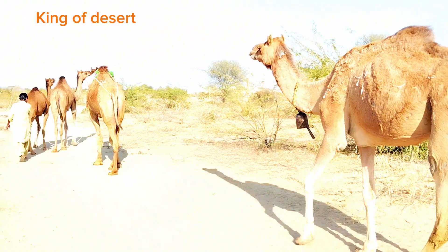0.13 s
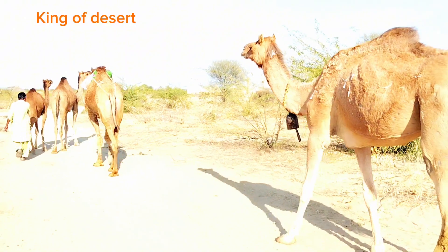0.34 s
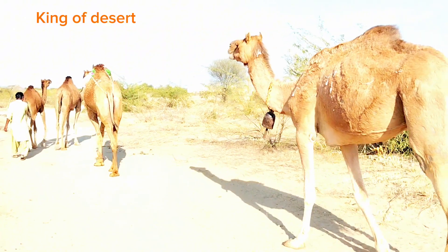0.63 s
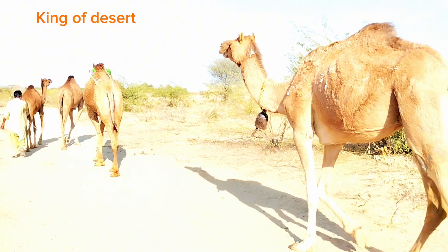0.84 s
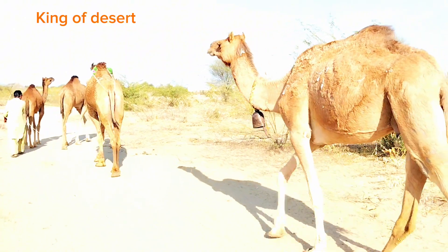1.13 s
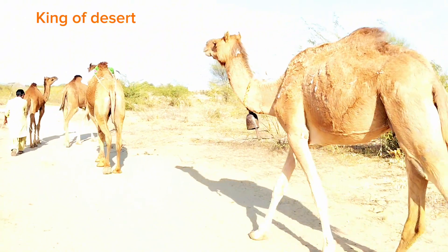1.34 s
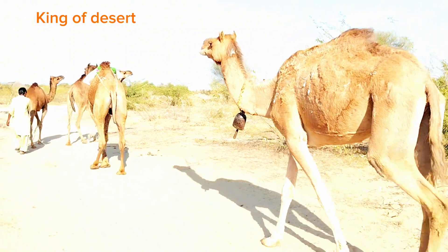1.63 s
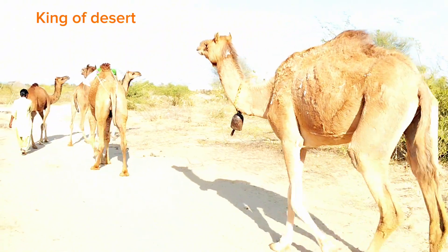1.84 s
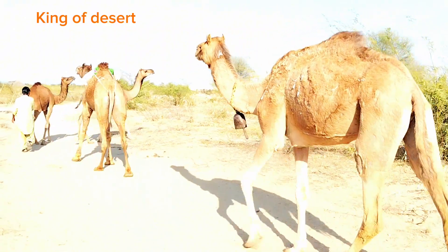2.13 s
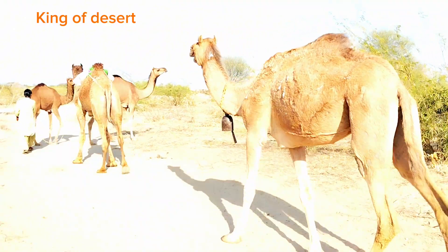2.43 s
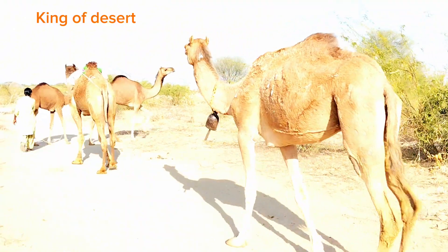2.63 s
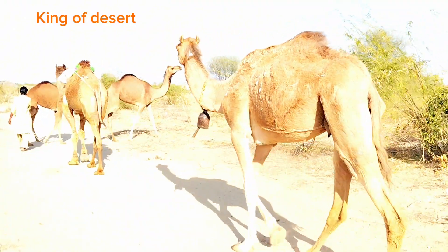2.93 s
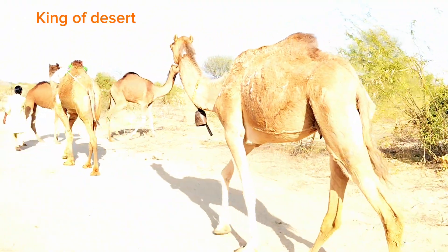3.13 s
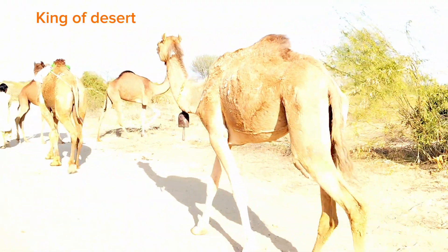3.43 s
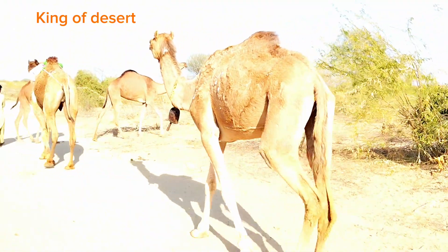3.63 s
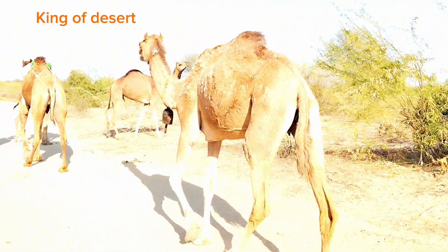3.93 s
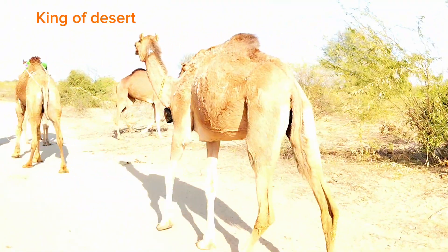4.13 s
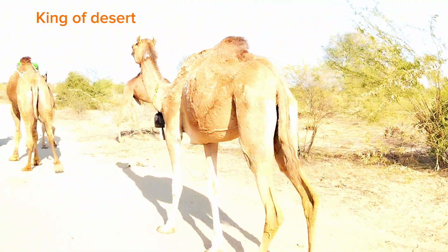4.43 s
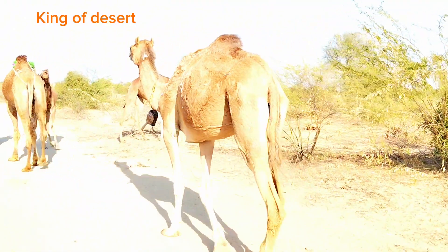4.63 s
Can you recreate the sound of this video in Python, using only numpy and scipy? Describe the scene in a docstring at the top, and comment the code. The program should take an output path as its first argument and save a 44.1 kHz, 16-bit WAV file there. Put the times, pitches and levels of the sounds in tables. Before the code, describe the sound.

A sheet-metal bell on a walking camel's neck clanks in loose clusters with each stride, its low hollow note humming on over soft wind.

```python
"""On a sandy track in open desert a camel walks with a sheet-metal bell on its neck, nearly all on the right.
At each stride the clapper strikes, bounces and scrapes; the bell's low pair beats and hums on, under dying wall
modes and bursts of clang. Feet scuff the sand in short resonant noise, with dry ticks and random crackle. A farther
bell is heard twice, first as a tail; shaped noise and pressure pulses make the light wind on the microphone."""
import sys
import numpy as np
from scipy import signal
from scipy.fft import rfft, irfft
from scipy.io import wavfile
from scipy.ndimage import uniform_filter1d

SR = 44100
rng = np.random.default_rng(int(sys.argv[2]) if len(sys.argv) > 2 else 0)


def int16_out(signal):
    """Quantize to a 16-bit WAV file."""
    q = np.round(np.clip(np.atleast_2d(signal).T, -1, 1) * 32767)
    wavfile.write(sys.argv[1], SR, q.astype(np.int16))


N = 211044
TIME = np.arange(N) / SR

# clapper blows, each stride's strike and its rebounds; levels are relative within each layer:
# [t/s, hum level/dB, twin level/dB, wall ring level/dB, treble level/dB, rim spot 0-2]
BLOWS = [(0.1654, -31, -22.5, -10.5, -11.5, 0.052), (0.2376, -46.5, -42.5, -51.5, -24.5, 0),
         (0.2523, -68, -26, -33.5, -20, 0), (1.1793, -17, -31.5, -1.5, -1, 0),
         (1.2145, -18.5, -73, -27, -10, 0), (1.291, -24.5, -51, -35, -17.5, 0),
         (1.3266, -32, -59, -10, -16, 1.53), (1.421, -66, -48, -39, -22.5, 2), (2.1204, -19, -28, -6, 4, 1),
         (2.1557, -23.5, -29, -1.5, -23, 1), (2.2298, -46.5, -50, -13, -12.5, 1.5),
         (2.2425, -30.5, -20.5, -17.5, -38.5, 2), (2.356, -31, -72.5, -45, -17, 2),
         (2.7996, -28.5, -36, -22.5, -23.5, 2), (2.8669, -31.5, -84, -54, -25, 2),
         (3.1903, -19.5, -24.5, -2.5, 2.5, 2), (3.2354, -34, -32, -13, -5, 0),
         (3.287, -59, -31.5, -39.5, -10.5, 2), (3.3631, -57.5, -34, -8, -21.5, 0.24),
         (3.3978, -35, -70, -22, -24.5, 2), (3.4423, -41.5, -70.5, -14.5, -23.5, 1.3),
         (3.8511, -25, -19.5, -15.5, -7.5, 1.42), (4.108, -27, -25, -6, -3.5, 1.57),
         (4.1434, -64, -54, -42, -19, 1), (4.1777, -42.5, -36.5, -7.5, -21, 1),
         (4.211, -28, -24.5, -11, -6, 0), (4.2875, -80, -35, -18.5, -24, 1.87),
         (4.7513, -41, -65.5, -22.5, -25, 2)]
# spectrum of the crowd of small, short wall modes, relative: [f/Hz, level/dB]
CLANG_SPECTRUM = [(700, -12), (1800, -7), (2700, -16.5), (3450, 12), (4200, -1.5), (5200, 1), (6800, 1.5),
                  (8200, -9), (9300, -13.5), (10500, -40), (15500, -27.5)]


def amp(db):
    """Decibels to gain."""
    return 10 ** (np.asarray(db) / 20)


def unit(x):
    """Scales to rms 1."""
    return x / np.sqrt(np.mean(x ** 2) + 1e-20)


def read(points, hz):
    """Reads a spectrum in dB on a log-frequency axis."""
    f, db = np.transpose(points)
    return np.interp(np.log(hz + 1), np.log(f + 1), db)


def add(mix, s, sound):
    """Mixes a sound in at time s."""
    part = mix[max(round(s * SR), 0):][:len(sound)]
    part += sound[:len(part)]


def coloured(points):
    """Noise of rms 1 with the given spectrum."""
    spectrum = rfft(rng.standard_normal(N))
    gain = amp(read(points, np.fft.rfftfreq(N, 1 / SR)))
    return unit(irfft(spectrum * gain, N))


def ring(t, hz, t60):
    """One dying mode, struck at t = 0; it falls 60 dB in t60 seconds."""
    t = np.maximum(t, 0)
    return np.sin(2 * np.pi * hz * t) * np.exp(-np.log(1000) * t / t60)


def resonate(x, hz, width_hz):
    """A resonance of gain 1."""
    r = np.exp(-np.pi * width_hz / SR)
    return 2 * signal.lfilter([1 - r], [1, -r * np.exp(2j * np.pi * hz / SR)], x).real


def hum(level_db=1.65, knock_db=-8.5, knock_hz=616.0, knock_width_hz=121.0):
    """The low pair beats; the air in the bell takes a few cycles to swell and radiate it."""
    # the bell's lowest note, a long hum and its short twin: [f/Hz, t60/s]
    hum_pair = [(470.15, 1.65), (478.3, .28)]
    # the bell leans on the neck and loses its hum: [from t/s, to t/s, loss/dB]
    leans = [(1.368, 1.502, 11.5), (2.903, 2.932, 19), (4.388, 4.448, 15.5)]
    cavity_hz, cavity_width_hz = 483.5, 31.5

    loss = amp(sum(db * np.clip((TIME - a) / (b - a), 0, 1) for a, b, db in leans))
    wall = np.zeros(N)
    for s, hum_db, twin_db, *_ in BLOWS:
        first = int(s * SR)
        span = slice(first, first + 3 * SR // 2)
        pair = sum(amp(db) * ring(TIME[span] - s, *mode) for db, mode in zip((hum_db, twin_db), hum_pair))
        wall[span] += pair * loss[first] / loss[span]  # only losses after the blow count
    knock = amp(knock_db) * resonate(wall, knock_hz, knock_width_hz)  # makes each onset hollow
    return amp(level_db) * (resonate(wall, cavity_hz, cavity_width_hz) - knock)


def wall_modes(sustain=1.605, touch_db=3.0, ring_touch_db=2.0, low_growth=1.03, tilt_db=-1.5):
    """Each blow rings the upper modes its rim spot favours; every later touch damps them, the treble most."""
    # upper wall modes, t60 before the sustain factor where f is 3 kHz or less:
    # [f/Hz, t60/s, level at rim spot 0/dB, level at spot 1/dB, level at spot 2/dB]
    modes = [(1180.5, 0.95, -50.0, -52.5, -38.0), (1327.5, 0.55, -51.0, -59.0, -55.0),
             (1818.0, 0.3, -59.0, -73.0, -56.0), (2025.0, 0.3, -67.0, -59.0, -66.0),
             (2334.0, 0.75, -63.0, -44.0, -45.0), (2392.0, 0.5, -42.0, -40.0, -54.0),
             (3477.0, 0.25, -62.0, -61.0, -48.0), (3590.0, 0.2, -50.0, -56.0, -60.0),
             (3673.0, 0.45, -50.0, -42.0, -44.0), (3918.0, 0.4, -55.0, -58.0, -60.0),
             (4017.0, 0.4, -62.0, -52.0, -41.0), (4139.0, 0.35, -63.0, -49.0, -61.0),
             (4267.0, 0.25, -67.0, -34.0, -58.0), (4580.0, 0.2, -58.0, -47.0, -44.0),
             (4619.0, 0.25, -59.0, -38.0, -52.0), (4778.0, 0.3, -75.0, -61.0, -43.0),
             (4968.0, 0.3, -67.0, -50.0, -53.0), (5128.0, 0.25, -71.0, -45.0, -62.0),
             (5540.0, 0.2, -59.0, -44.0, -62.0), (5711.0, 0.22, -73.0, -39.0, -59.0),
             (6110.0, 0.25, -57.0, -56.0, -53.0), (6643.0, 0.25, -49.0, -40.0, -59.0),
             (6805.0, 0.22, -57.0, -57.0, -54.0), (7125.0, 0.25, -58.0, -50.0, -53.0),
             (7465.0, 0.18, -70.0, -44.0, -63.0), (7995.0, 0.18, -74.0, -52.0, -64.0)]
    hz, t60, *spot_db = np.transpose(modes)
    low, treble = hz < 1500, hz > 3000
    life = t60 * np.where(treble, 1, sustain)
    shapes = ring(TIME[:SR], hz[:, None], life[:, None])
    sign = (-1) ** np.arange(len(hz))  # neighbouring modes start in opposite directions
    octaves = np.log2(hz / 6000)
    starts = np.transpose(BLOWS)[0]
    out = np.zeros(N)
    for s, _, _, ring_db, high_db, spot in BLOWS:
        nearness = np.maximum(1 - abs(np.arange(len(spot_db)) - np.clip(spot, 0, 2)), 0)
        ring_force_db = np.where(low, low_growth * ring_db, ring_db)  # the lowest grow slightly faster with force
        force_db = np.where(treble, high_db + tilt_db * octaves, ring_force_db)
        size = sign * amp(force_db) * (nearness @ amp(spot_db))
        touches = np.searchsorted(starts[starts > s], s + TIME[:SR])  # later blows so far
        for group, loss_db in ((~treble, ring_touch_db), (treble, touch_db)):
            add(out, s, amp(-abs(loss_db) * touches) * ((size * group) @ shapes))
    return out


def crowd(t60, count=90):
    """Many close, short wall modes of uneven strength, one row each."""
    hz = np.linspace(700, 9600, count) + rng.uniform(-45, 45, count)
    life = t60 * np.exp(0.21 * rng.standard_normal(count))
    uneven_db = 4.5 * rng.standard_normal(count)
    strength = amp(read(CLANG_SPECTRUM, hz) + uneven_db)
    return strength[:, None] * ring(TIME[:SR // 3], hz[:, None], life[:, None])


def clang(clang_db=-43.5, crack_db=-34.5, t60=0.11, chatter=0.36, count=3):
    """Each blow cracks and shakes the crowd of small modes; the clapper then chatters lightly on the wall."""
    modes, hiss, out = crowd(t60), coloured(CLANG_SPECTRUM), np.zeros(N)
    hardness_db = [-1., 4., 1.]  # by rim spot
    snap = np.exp(-TIME[:SR // 3] / .004)
    for s, *_, db, spot in BLOWS:
        force = amp(db + np.interp(spot, range(len(hardness_db)), hardness_db))
        delays = np.r_[0, np.cumsum(rng.uniform(.003, .02, count))]  # seconds after the blow
        shares = np.r_[1, chatter * rng.random(count)]
        for delay, share in zip(delays, shares):
            tail = rng.standard_normal(len(modes)) @ modes
            tail /= np.std(tail[:SR // 50])
            crack = np.roll(hiss, rng.integers(N))[:len(snap)] * snap
            add(out, s + delay, force * share * (amp(clang_db) * tail + amp(crack_db) * crack))
    return out


def clunk(level_db=-62.0, hz=910.0, width_hz=1800.0, fall_s=.012, growth=0.33):
    """The clapper itself gives a dull, rough knock at each blow: resonant noise that dies fast."""
    out, t = np.zeros(N), TIME[:SR // 8]
    for s, _, _, ring_db, *_ in BLOWS:
        noise = rng.standard_normal(len(t))
        body = unit(resonate(resonate(noise, hz, width_hz), hz, width_hz))
        add(out, s, amp(level_db + growth * ring_db) * body * np.exp(-t / fall_s))
    return out


def scrapes(level_db=-6.0, t60=0.061, slips_per_s=220):
    """The sliding clapper sticks and slips, each slip a tiny tap on the damped wall."""
    # slides along the rim, levels before level_db: [t/s, level/dB, length/s]
    slides = [(0.0, -62.5, 0.086), (1.41, -59, 0.091), (1.653, -61, 0.049), (1.931, -58, 0.049),
              (2.202, -38.5, 0.064), (2.307, -51.5, 0.025), (2.371, -51, 0.032), (2.778, -54, 0.059),
              (2.986, -62.5, .07), (3.349, -45.5, 0.082), (3.445, -59.5, 0.13), (3.713, -60.5, 0.021),
              (3.981, -57.5, 0.08), (4.196, -53, 0.18)]
    modes, out = crowd(t60), np.zeros(N)
    for s, db, length in slides:
        size = int(length * SR)
        taps = rng.standard_normal(N)[:size]
        slipping = rng.random(N)[:size] < slips_per_s / SR
        slips = taps * (slipping + 0.0092)  # a faint rub stays between slips
        wall = rng.standard_normal(len(modes)) @ modes
        rasp = signal.fftconvolve(slips * signal.windows.tukey(size, .5), wall)
        add(out, s, amp(level_db + db) * rasp / np.std(rasp[:size]))
    return out


def scuffs(width_share=0.42):
    """Feet scuff the sand and twigs: short bursts of grit, each round one resonance."""
    # each burst peaks a third of its length in: [t/s, level/dB, centre f/Hz, length/s]
    steps = [(0.0, -65, 2230, 0.091), (0.555, -56.5, 2470, 0.0051), (0.637, -53, 970, 0.013),
             (0.676, -61, 2310, 0.031), (0.739, -60.5, 2350, 0.012), (0.778, -55, 2340, 0.0048),
             (0.875, -59.5, 677, 0.0061), (0.993, -53.5, 1730, 0.003), (1.964, -51, 2240, 0.013),
             (2.028, -45.5, 2320, 0.0025), (2.402, -45, 1550, 0.0022), (3.353, -48, 2560, 0.0081),
             (3.439, -65, 2260, 0.028), (3.98, -64, 2820, 0.0098), (4.48, -75, 1570, 0.01),
             (4.739, -60.5, 2104, 0.0072)]
    out, t = np.zeros(N), TIME[:SR // 6]
    for s, db, hz, length in steps:
        noise = rng.standard_normal(len(t))
        rub = resonate(resonate(noise, hz, width_share * hz), hz, 2 * width_share * hz)
        u = 3 * t / length
        add(out, s, amp(db) * unit(rub) * u * np.exp(1 - u))
    return out


def grit(level_db=-77.0, grains_per_s=45, spread_db=5.0, grain_s=0.0036):
    """Sand grains and dry stalks crackle at random under the herd's feet, in eight resonant sizes."""
    out, t = np.zeros(N), TIME[:SR // 25]
    for hz in np.geomspace(1400, 3200, 8):
        chance, size = rng.random(N), np.minimum(rng.exponential(1, N), 2)
        grain = resonate(rng.standard_normal(len(t)) * np.exp(-t / grain_s), hz, hz / 2)
        grain = unit(resonate(grain, hz, hz / 2))
        hits = (chance < grains_per_s / 8 / SR) * amp(spread_db * size)
        out += signal.oaconvolve(hits, grain)[:N]
    return amp(level_db) * unit(out)


def ticks(top_hz=4500, fall_s=.0006):
    """Sharp one-sided pulses with no ring, softened above top_hz."""
    # small dry ticks, levels before the softening: [t/s, level/dB]
    clicks = [(0.225, -33.5), (0.8245, -34.5), (0.9266, -30.5), (1.105, -35.5), (2.01, -35), (2.330, -29.5),
              (2.5112, -32.5), (3.083, -34.5), (3.666, -32), (4.4192, -34)]
    out = np.zeros(N)
    for s, db in clicks:
        add(out, s, -amp(db) * np.exp(-TIME[:SR // 100] / fall_s))
    return signal.sosfilt(signal.butter(4, top_hz, fs=SR, output="sos"), out)


def dull(x, top_hz=8960.0, unfiltered_db=-8.5, order=10):
    """A duller top: a steep low-pass near 9 kHz, with a weaker unfiltered share mixed back in."""
    low_pass = signal.butter(order, top_hz, fs=SR, output="sos")
    return signal.sosfilt(low_pass, x) + amp(unfiltered_db) * x


def other_bell(hz=743, t60=0.78, knock_hz=854.0, knock_t60=0.014):
    """A bell farther off: only its low note and a brief knock carry."""
    # strikes, the first before the start so that only its tail is heard: [t/s, level/dB]
    strikes = [(-.36, -41), (4.694, -39.5)]
    return sum(amp(db) * (ring(TIME - s, hz, t60) - ring(TIME - s, knock_hz, knock_t60)) for s, db in strikes)


def buffets():
    """Single eddies bump the microphone, each one push and pull of pressure."""
    # eddies, length being the time scale of the pulse: [t/s, level/dB, length/s]
    bumps = [(.876, -32, 0.0024), (0.906, -23.5, 0.0059), (.959, -25, 0.0029), (1.267, -27, 0.0023),
             (1.31, -27.5, 0.0027), (1.462, -30.5, 0.01), (1.91, -28, 0.0031), (2.083, -27.5, 0.0035),
             (2.935, -28.5, 0.0038), (4.341, -31.5, 0.0029)]
    out = np.zeros(N)
    for s, db, length in bumps:
        u = (TIME - s) / length
        out -= 2 * amp(db) * u * np.exp(-u ** 2)
    return out


def wind(gust_db=1.0, rumble_db=2.5, flutter_db=-14.0, flutter_growth=1.43, eddy_db=2.0):
    """Gusts on an uneven breeze make a slow rumble, and a quicker flutter that grows faster with strength."""
    # strength of the breeze between gusts, with one lull, before the eddies: [t/s, level/dB]
    breeze = [(0, -44), (.65, -47), (1.8, -45.5), (2.6, -47.5), (3.75, -46), (3.85, -60), (4.15, -55),
              (4.4, -46.5)]
    # gusts on the microphone, before gust_db: [start t/s, length/s, level/dB]
    gusts = [(0.049, 0.055, -42), (0.146, 0.04, -38), (0.309, 0.074, -40.5), (0.819, 0.19, -38.5),
             (1.193, 0.32, -39), (1.859, 0.11, -42), (2.04, 0.136, -40), (2.339, 0.026, -43),
             (2.391, 0.081, -39), (2.543, 0.14, -44), (2.663, 0.061, -39.5), (2.791, 0.066, -40),
             (2.926, 0.094, -33.5), (3.085, 0.047, -42.5), (3.246, 0.064, -52.5), (4.279, 0.14, -41.5),
             (4.434, 0.168, -42.5), (4.733, 0.06, -42)]
    # relative spectra of rumble and flutter: [f/Hz, level/dB]
    rumble_spectrum = [(10, 8), (25, 2), (55, 0), (85, -3), (130, -27.5), (300, -92.5)]
    flutter_spectrum = [(40, -28.5), (90, 1), (130, 1), (200, -9), (300, -18.5), (500, -46), (1200, -36),
                        (4000, -88.5)]
    gust_edge_s = 0.04  # a gust swells and dies in this time

    eddies = unit(uniform_filter1d(uniform_filter1d(rng.standard_normal(N), size=3000), size=2000))
    strength = amp(np.interp(TIME, *np.transpose(breeze)) + eddy_db * (np.minimum(eddies, 2) - 2))
    for s, length, db in gusts:
        inside = np.minimum(TIME - s, s + length - TIME)
        gust = amp(gust_db + db) * np.clip(.5 + inside / gust_edge_s, 0, 1)
        strength = np.hypot(strength, gust)
    flutter = strength * (strength / np.mean(strength)) ** (flutter_growth - 1)
    rumble_sound = amp(rumble_db) * strength * coloured(rumble_spectrum)
    return rumble_sound + amp(flutter_db) * flutter * coloured(flutter_spectrum)


def air(level_db=-60.5):
    """A faint, even hiss of breeze over open ground."""
    # relative spectrum of open desert air: [f/Hz, level/dB]
    air_spectrum = [(100, 17.5), (400, 6.5), (900, -1.5), (1500, -2.5), (2300, -2), (3300, -5.5),
                    (4600, -11), (7000, -5.5), (8400, -15.5), (9800, -41.5), (14000, -32), (15500, -16)]
    return amp(level_db) * coloured(air_spectrum)


def scene(right_db=5.0, leak_db=-43.5, left_hiss_db=-64.5, left_wind_db=-50.0):
    """Everything reaches the right channel; the left has only a trace, with its own steady rumble and hiss."""
    # relative spectra of the left channel's noises: [f/Hz, level/dB]
    left_hiss = [(50, 17), (150, 13.5), (400, 6), (1000, 0), (2500, -5), (6500, -10.5), (9000, -29.5),
                 (14000, -29.5), (15500, -16.5)]
    left_rumble = [(10, -8.5), (25, 3), (55, -7), (80, -16), (110, -27), (250, -78)]
    bell = hum() + clunk() + dull(wall_modes() + clang() + scrapes())
    ground = dull(scuffs() + grit()) + ticks()
    sound = bell + other_bell() + ground + wind() + buffets() + air()
    left = amp(leak_db) * sound
    left += amp(left_hiss_db) * coloured(left_hiss)
    left += amp(left_wind_db) * coloured(left_rumble)
    return np.array([left, amp(right_db) * sound])


def record(dry, edge_hz=16000):
    """The recorder's band limit."""
    band = signal.firwin(511, edge_hz, window=("kaiser", 9), fs=SR)
    return signal.oaconvolve(dry, band[None], "same")


dry = scene()
out = record(dry)
int16_out(out)
```